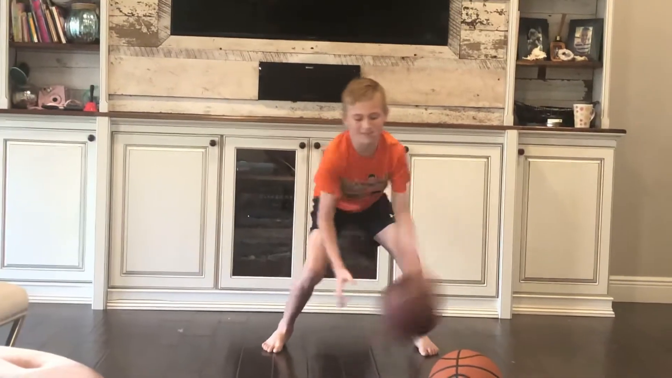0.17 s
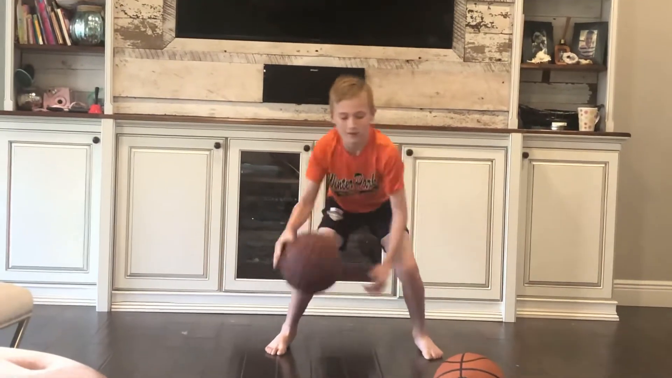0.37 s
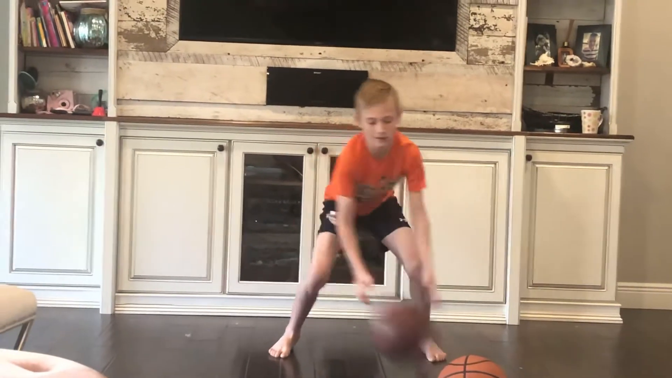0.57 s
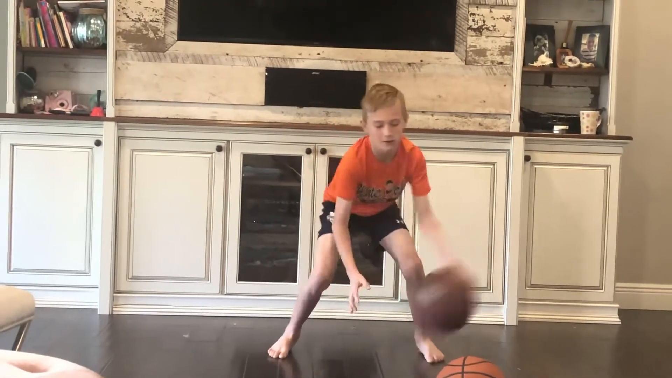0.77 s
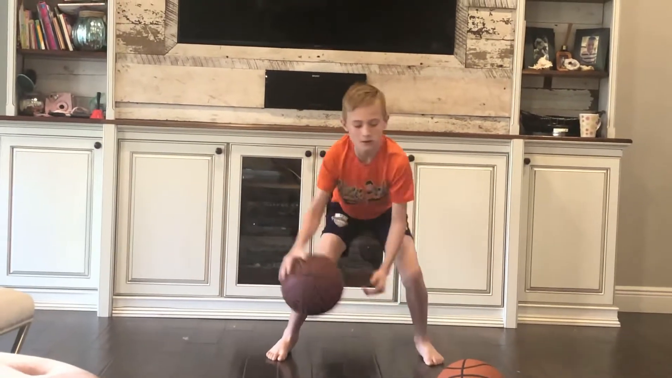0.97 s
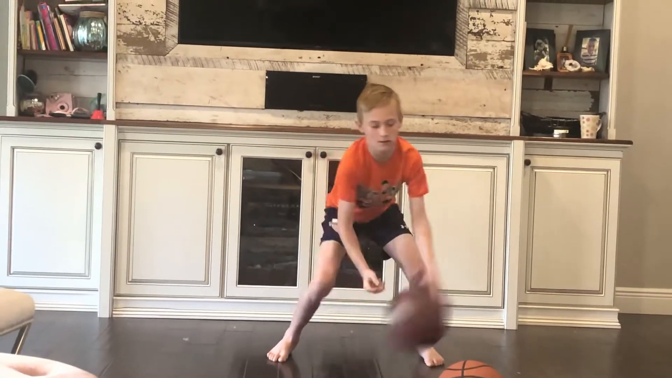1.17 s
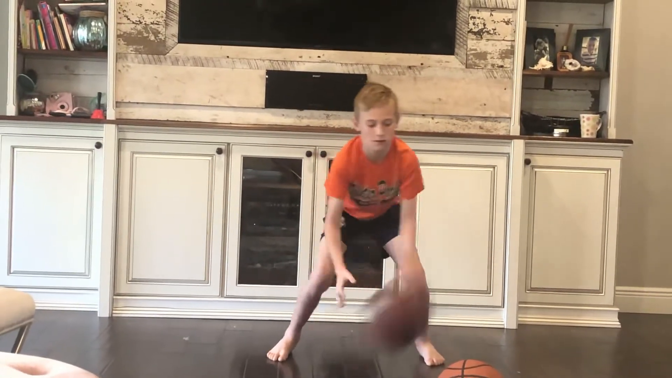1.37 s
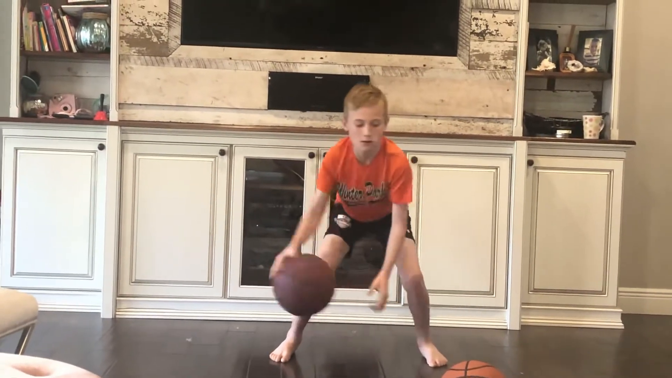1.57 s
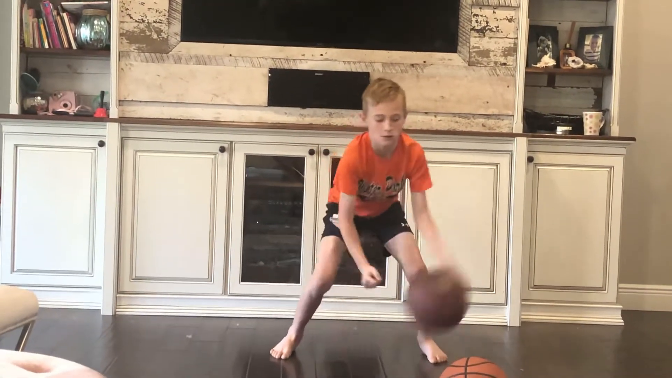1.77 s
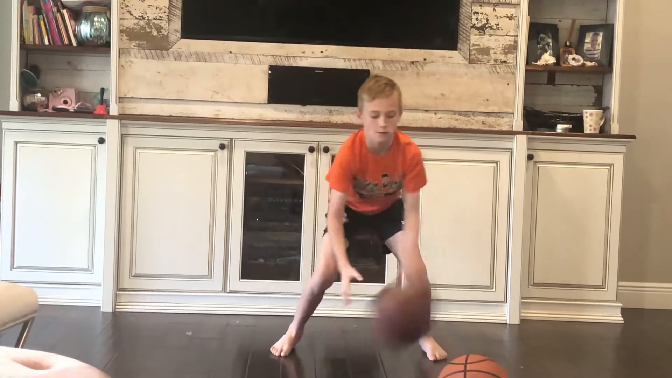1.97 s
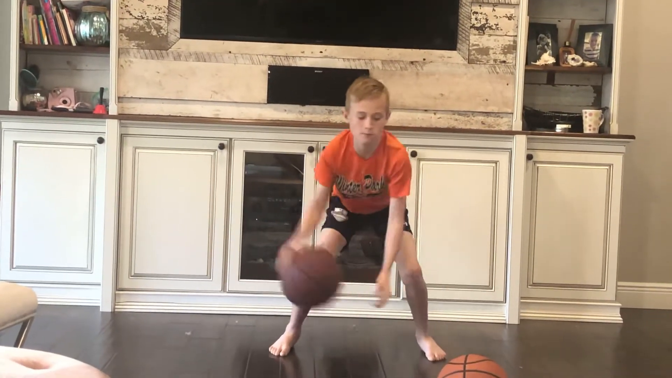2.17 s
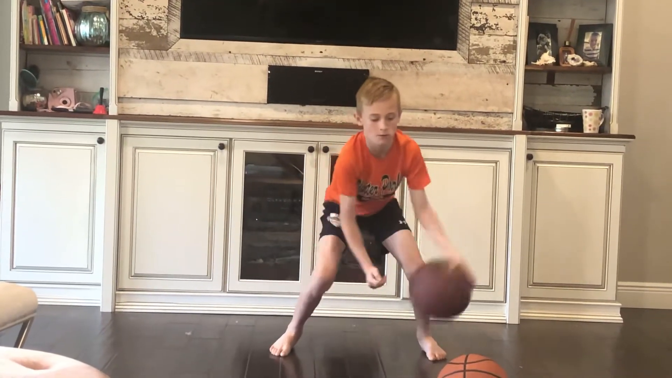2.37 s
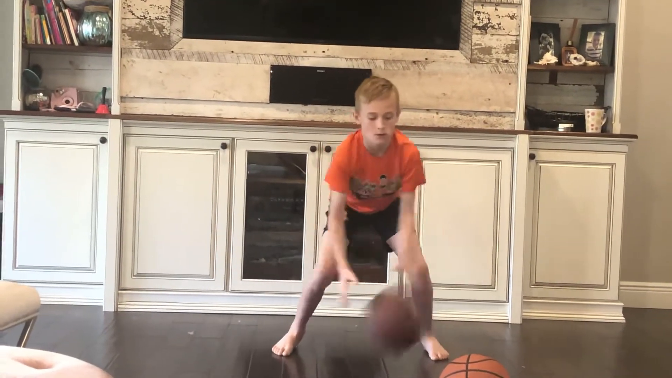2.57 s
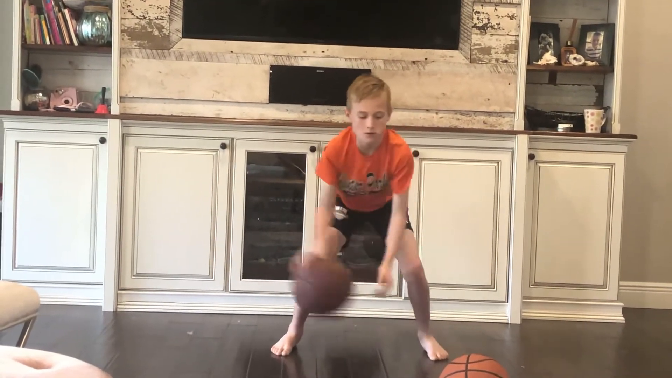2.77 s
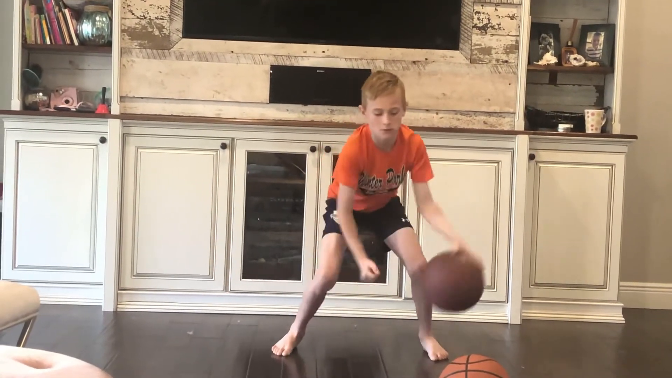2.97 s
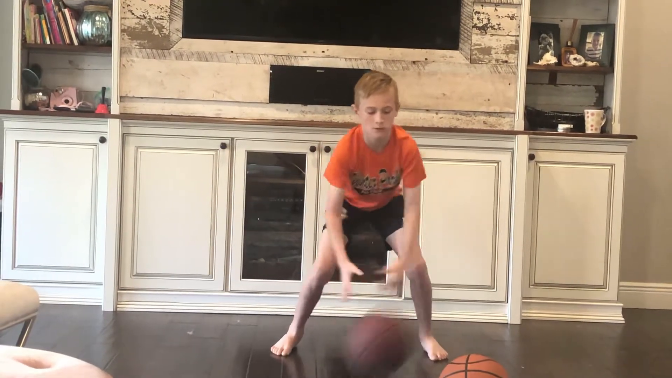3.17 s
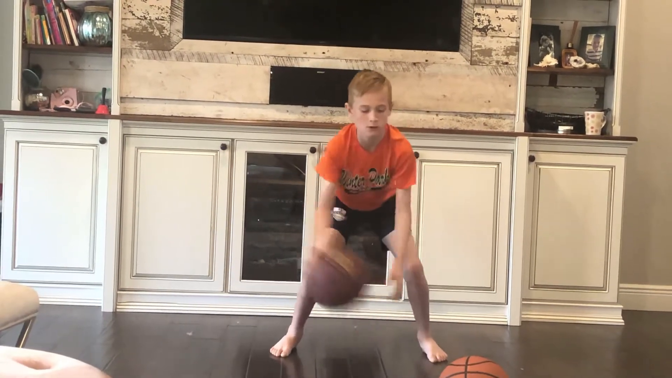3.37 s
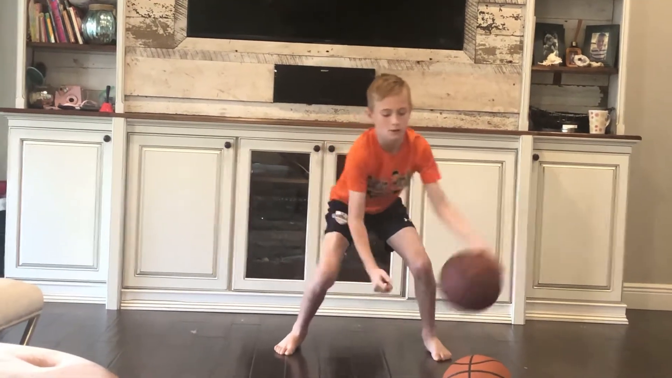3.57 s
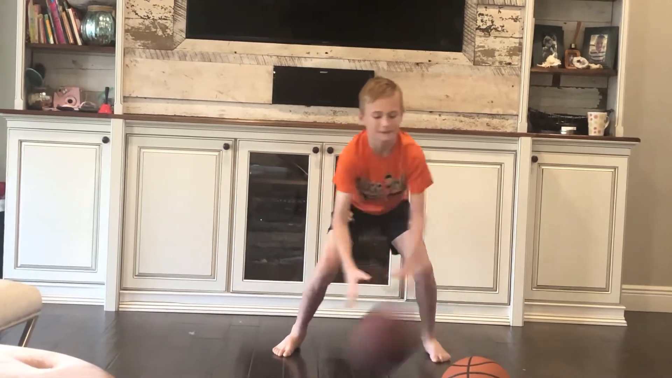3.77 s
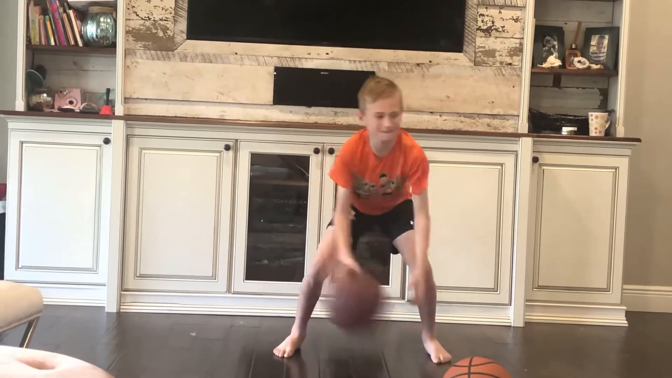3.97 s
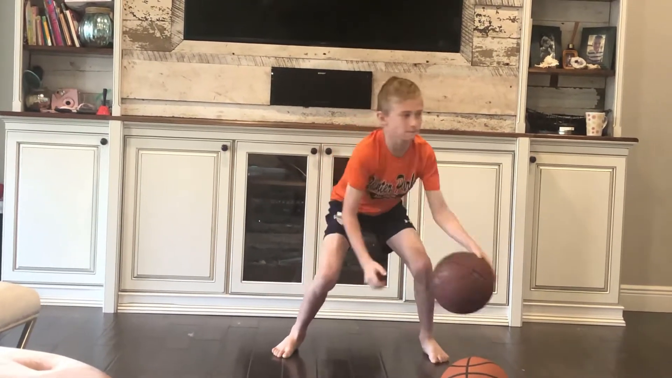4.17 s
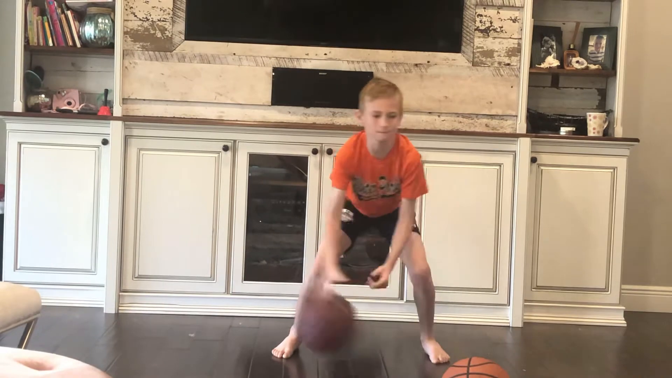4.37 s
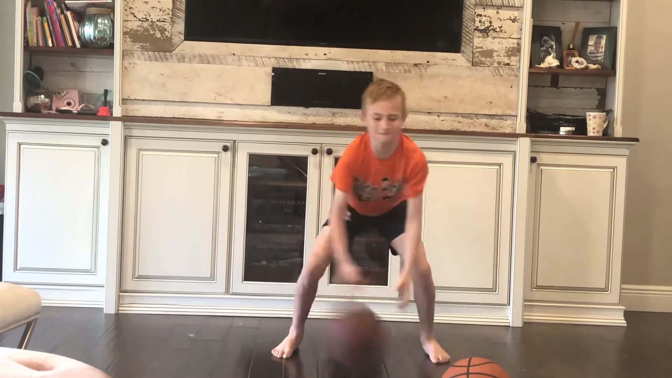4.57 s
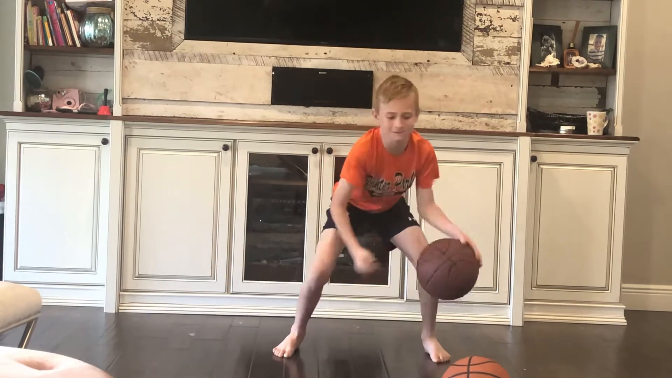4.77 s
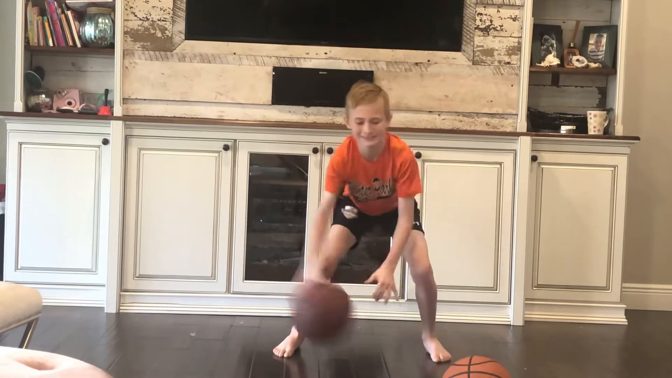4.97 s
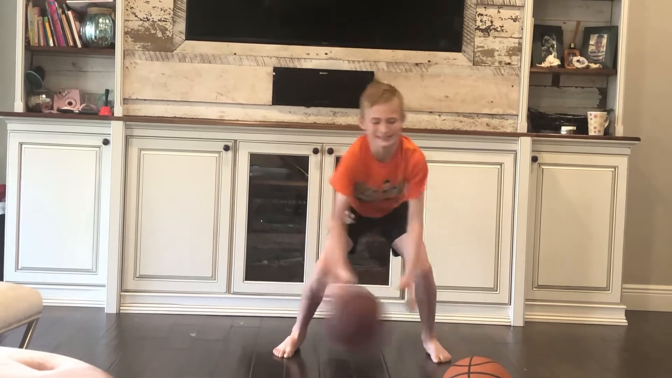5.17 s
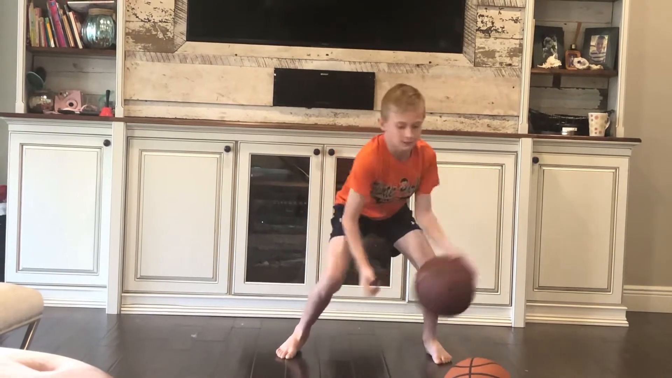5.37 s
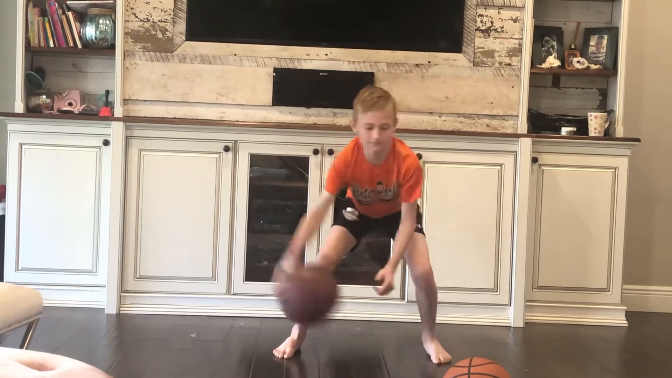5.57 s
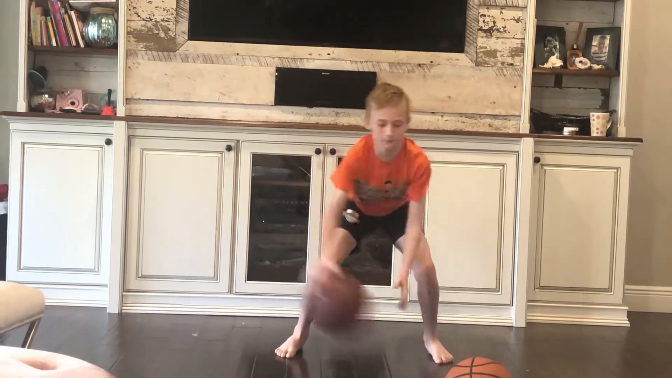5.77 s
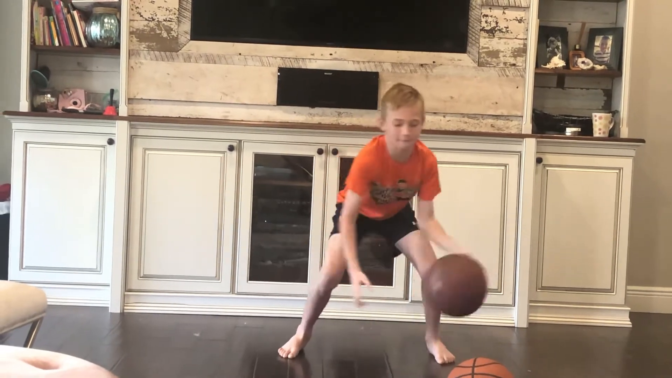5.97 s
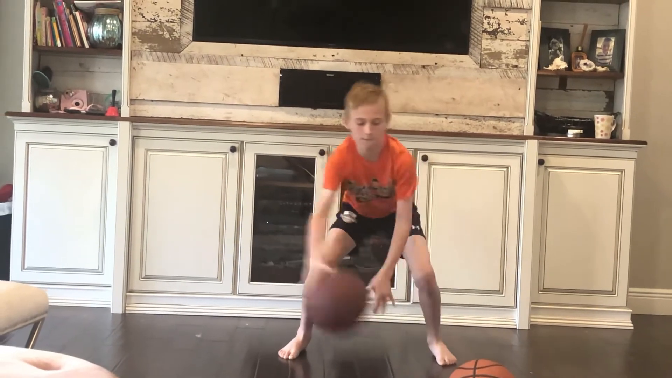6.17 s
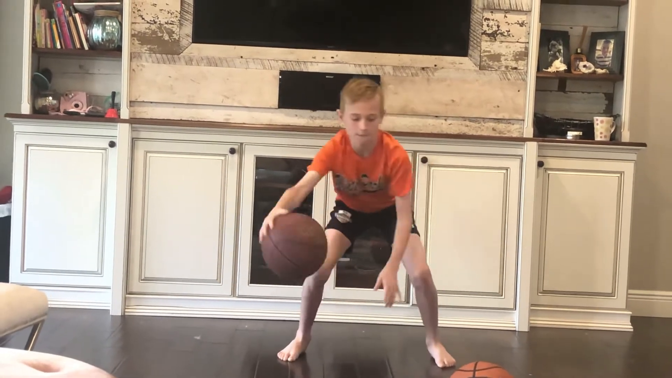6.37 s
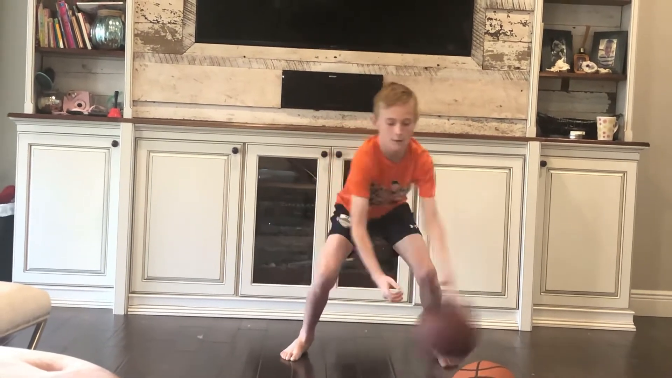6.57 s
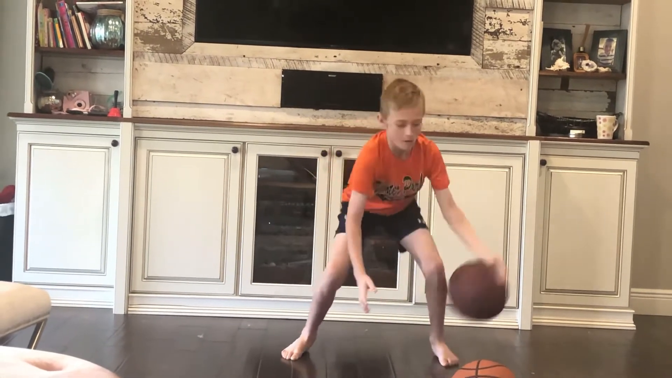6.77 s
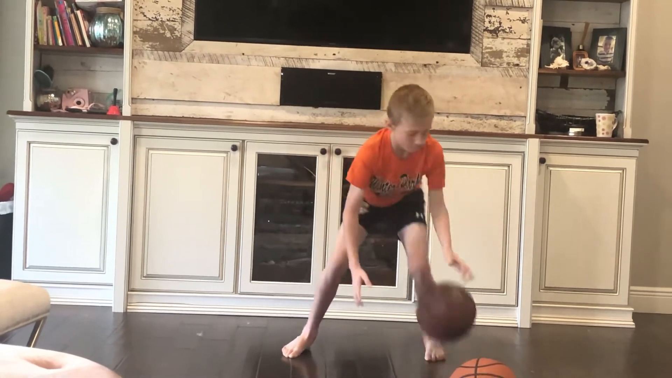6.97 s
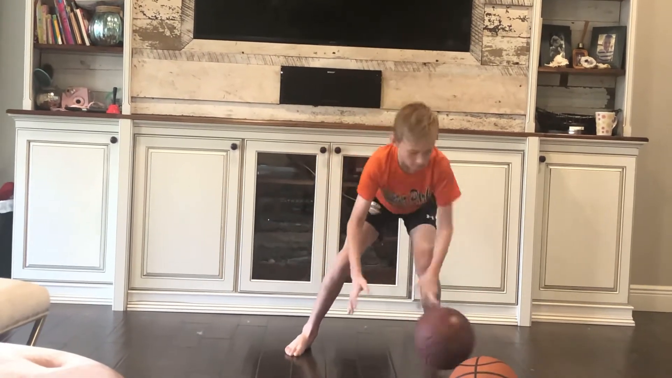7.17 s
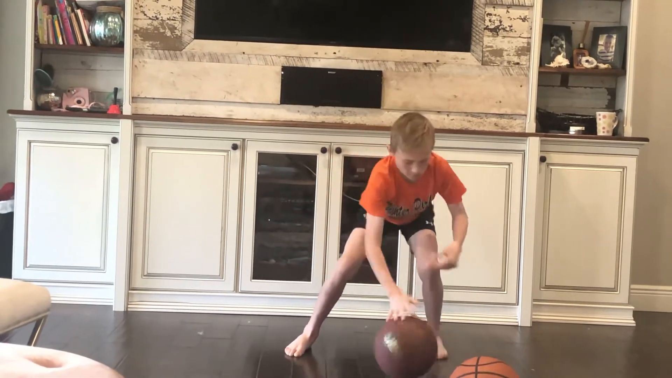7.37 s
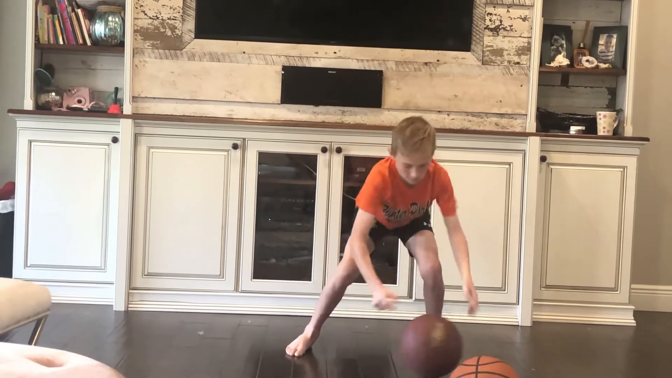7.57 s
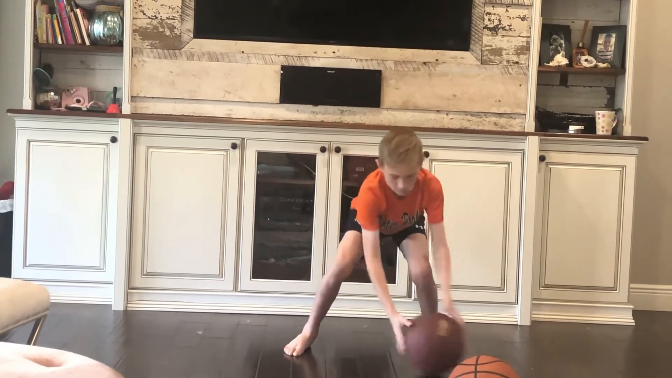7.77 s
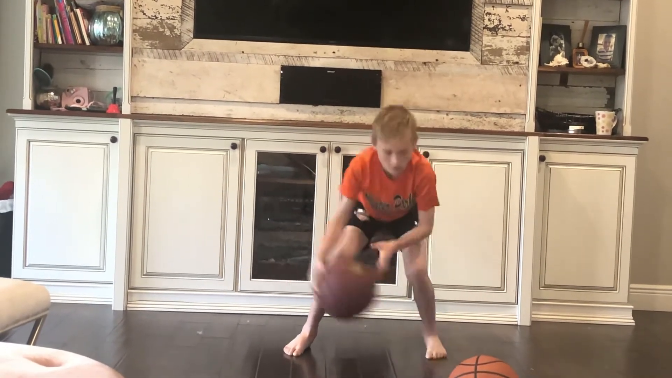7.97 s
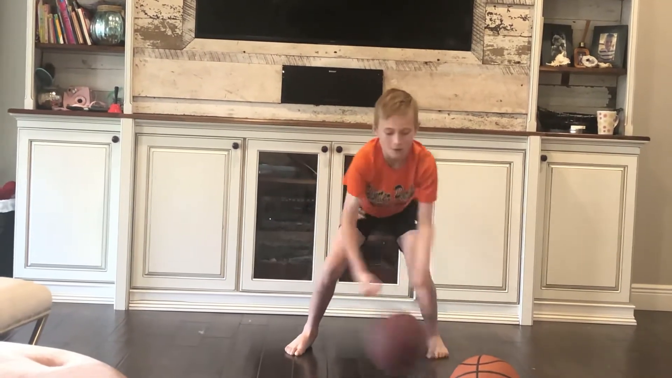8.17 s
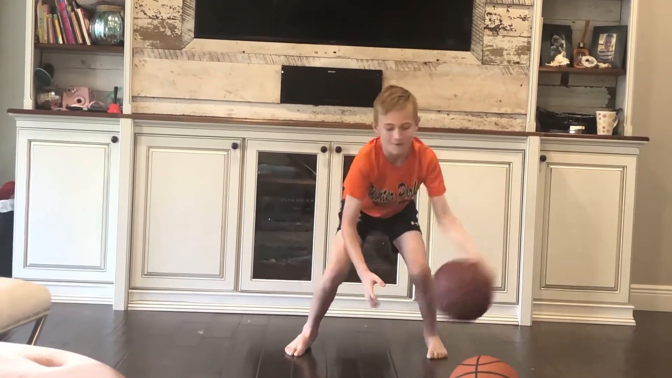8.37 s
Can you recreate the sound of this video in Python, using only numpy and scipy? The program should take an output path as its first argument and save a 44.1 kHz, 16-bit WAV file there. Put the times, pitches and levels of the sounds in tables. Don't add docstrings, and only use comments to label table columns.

```python
import sys
import numpy as np
from scipy import signal
from scipy.fft import irfft
from scipy.io import wavfile

SR = 44100
rng = np.random.default_rng(int(sys.argv[2]) if len(sys.argv) > 2 else 0)


def store_pcm(level_fs):
    pcm = np.round(np.clip(level_fs, -1, 1) * 32767).astype(np.int16)
    wavfile.write(sys.argv[1], SR, np.atleast_2d(pcm).T)


def volts_from_decibels(level):
    exponent = np.asarray(level, float) / 20
    return 10 ** exponent


N = 371763
LEAD = 4410
TAIL = 28000


def at_hz(points, hz):
    table_hz, value = np.array(points).T[:2]
    return np.interp(np.log(hz), np.log(table_hz), value)


def noise(size):
    return rng.standard_normal((2, size)) * np.sqrt(SR / 2)


def high_pass(x, order, hz):
    return signal.sosfilt(signal.butter(order, hz, "high", fs=SR, output="sos"), x)


def low_pass(x, order, hz):
    return signal.sosfilt(signal.butter(order, hz, fs=SR, output="sos"), x)


def band_pass(x, low_hz, high_hz):
    return signal.sosfilt(signal.butter(2, [low_hz, high_hz], "band", fs=SR, output="sos"), x)


def bands(white, shape):
    edges = 25 * 2 ** np.arange(0, 9.6, 0.5)
    total = 0
    for k, (low, high) in enumerate(zip(edges, edges[1:])):
        total = total + shape(np.sqrt(low * high)) * band_pass(white[k % len(white)], low, high)
    return total


# frequency in Hz, level in dB per Hz.
BACKGROUND = [(35, -88.5), (60, -83), (130, -73), (180, -89), (260, -93), (750, -92), (1500, -98.5),
              (2800, -107), (4500, -113), (8000, -117), (12000, -121), (16000, -123)]


def background():
    return bands(noise(N), lambda hz: volts_from_decibels(at_hz(BACKGROUND, hz)))


# frequency in Hz, decay by 60 dB in seconds.
ROOM_T60 = [(50, 0.12), (85, 0.69), (130, 0.49), (220, 0.63), (400, 0.51), (900, 0.85), (1700, 0.66),
            (3000, 0.53), (6400, 0.93), (12000, 0.2)]


def diffuse_tail(build_s, cycles, count):
    t = np.arange(TAIL) / SR

    def envelope(hz):
        clump_db = 2.0 * rng.standard_normal((count, TAIL // 400))
        clumps = np.array([np.interp(t, t[::400], volts_from_decibels(row)) for row in clump_db])
        swell = 1 - np.exp(-(t / (build_s + cycles / hz)) ** 2)
        return clumps * swell * volts_from_decibels(-60 * t / at_hz(ROOM_T60, hz))

    white = noise(count * TAIL).reshape(2, count, TAIL)
    return bands(white, envelope) / SR


def echoes(table, count):
    round_ms, round_loss_db = 9.4, 8.0
    out = np.zeros(SR // 5)
    rounds = np.arange(count + 1)
    for ms, db in table:
        at = np.round((ms + round_ms * rounds) * SR / 1000).astype(int)
        out[at] += volts_from_decibels(db - round_loss_db * rounds)
    return out


def standing_wave(level_db):
    hz, swell_s, t60_s = 121.86, 0.09, 0.45
    t = np.arange(TAIL) / SR
    swell = 1 - np.exp(-(t / swell_s) ** 4)
    return swell * volts_from_decibels(level_db - 60 * t / t60_s) * np.sin(2 * np.pi * hz * t)


# delay in ms, level in dB.
FAR_ECHOES = [(65.5, -5.0), (78.0, -4.0)]


def push(early, standing_db):
    deep = volts_from_decibels(17.0) * high_pass(diffuse_tail(build_s=0.053, cycles=0.42, count=1)[0], 2, 80)
    deep += standing_wave(standing_db)
    deep[:len(early)] += early + low_pass(echoes(FAR_ECHOES, count=0), 2, 100)
    return signal.fftconvolve(deep, np.hanning(176))


def modes(level_db, table, spread_db):
    t, out = np.arange(4000) / SR, np.zeros(4000)
    for hz, db, t60 in table:
        luck, side = rng.standard_normal(2)
        decay = volts_from_decibels(level_db + db + spread_db * luck - 60 * t / t60)
        out += np.sign(side) * decay * np.sin(2 * np.pi * hz * t)
    return low_pass(out, 3, 2200)


# frequency in Hz, level in dB, decay by 60 dB in seconds.
BOARDS = [(388.2, -4.5, 0.11), (415, 1.5, 0.044), (507, -3.5, 0.034)]
# frequency in Hz, level in dB, decay by 60 dB in seconds.
LOW_RING = [(606, -10, 0.0083), (684, -6, 0.029), (755, -4.5, 0.041), (838, -10, 0.047)]


def low_ring(push_db, low_db):
    boards = modes(0.64 * push_db + 0.24 * low_db - 18.0, BOARDS, spread_db=1.5)
    return boards + modes(low_db + 7.5, LOW_RING, spread_db=2.5)


# frequency in Hz, level in dB, decay by 60 dB in seconds.
UPPER_RING = [(908, -8, 0.013), (950, -12.5, 0.076), (1112, -1.5, 0.015), (1239, -2.5, 0.014),
              (1306, -4.5, 0.019), (1530, -10.5, 0.012), (1787, -10, 0.01), (1965, -15.5, 0.0056)]


def upper_ring(upper_db):
    return modes(upper_db + 7.0, UPPER_RING, spread_db=1.74)


# frequency in Hz, level in dB per Hz.
SLAP = [(500, -31), (1200, -14), (1900, 11), (2800, 5.5), (4400, -1), (6600, -8.5), (9800, -16.5),
        (14000, -29)]


def slap(slap_db):
    over_db = np.clip(slap_db + 56.5, -12.0, 12.0)
    tilt_db = -0.13 * over_db
    hz = np.maximum(np.arange(2001) * SR / 4000, 10)
    octaves = np.log2(np.clip(hz, 2100.0, 11500.0) / 3500)
    colour = volts_from_decibels(slap_db + at_hz(SLAP, hz) + tilt_db * octaves)
    delay = np.exp(-2j * np.pi * hz * 0.000789)
    return volts_from_decibels(29.0) * irfft(colour * delay)


def landings(hits, early_table, standing_db=-60.5):
    early, out = echoes(early_table, count=9), np.zeros(LEAD + N + SR)
    thump = push(early, standing_db)
    spaces = volts_from_decibels(27.5) * diffuse_tail(build_s=0.00035, cycles=3.4, count=len(hits))
    for (s, push_db, low_db, upper_db, slap_db), space in zip(hits, spaces):
        body, skin, tick = low_ring(push_db, low_db), upper_ring(upper_db), slap(slap_db)
        space[:len(early)] += volts_from_decibels(-13.5) * early
        space[round(0.008 * SR)] += volts_from_decibels(0.5)
        direct = volts_from_decibels(-6.5) * body + volts_from_decibels(4.5) * skin + volts_from_decibels(5.5) * tick
        reflected = signal.fftconvolve(body + skin + tick, space)
        at = round(s * SR) + LEAD
        for part in (volts_from_decibels(push_db) * thump, direct, reflected):
            out[at:at + len(part)] += part
    return out[LEAD:LEAD + N]


# start in seconds, then push, low ring, upper ring and slap in dB.
RIGHT_HITS = [(-.0388, -15, -36, -45.5, -70), (0.5515, -11.5, -51, -42, -68.5),
              (1.1117, -13.5, -42, -44, -60.5), (1.679, -12.5, -40.5, -46.5, -63),
              (2.2634, -13, -44.5, -38.5, -64), (2.844, -12.5, -41, -39.5, -66),
              (3.4577, -11, -41, -41, -78), (4.0196, -10.5, -41, -42, -62),
              (4.5775, -14.5, -44, -43.5, -65.5), (5.201, -12, -42, -45.5, -65),
              (5.7871, -11.5, -41.5, -39, -65), (6.5314, -10.5, -37, -46, -62.5),
              (8.1646, -14.5, -42.5, -47.5, -71.5)]
LEFT_HITS = [(0.2098, -14, -42, -45, -61), (0.8383, -14, -34, -43.5, -68.5),
             (1.4086, -13.5, -42.5, -42.5, -61), (1.9728, -14, -42.5, -43.5, -61.5),
             (2.5627, -15.1, -44, -44, -59.5), (3.1375, -13.4, -41.5, -47, -65.5),
             (3.7426, -12.5, -43, -41, -65.5), (4.3259, -15.5, -45, -48.5, -64.5),
             (4.9108, -13.5, -40.5, -42, -71), (5.4673, -14, -38, -43, -69.5)]
WIDE_HIT = [
    (6.0787, -12.5, -39, -45.5, -61),
]
STRAY_HIT = [
    (6.87, -20.5, -48.5, -45.5, -76),
]
LOOSE_HIT = [
    (7.1313, -17.5, -43.5, -47.5, -72),
    (7.897, -63, -84, -77, -79.5),
]
# start in seconds, push in dB.
PATTER = [
    (7.282, -35),
    (7.336, -32),
    (7.375, -34),
    (7.41, -38),
    (7.645, -38.5),
    (7.765, -43.5),
]
# delay in ms, level in dB.
RIGHT_ECHOES = [(4.0, -11.6), (10.4, -10), (12.8, -3.7), (30.8, -12.4), (35.2, -6.2), (36.8, -3.5),
                (38.8, -5.4), (41.2, -11)]
LEFT_ECHOES = [(4.4, -4.4), (10.4, -2), (14.8, -13), (24.8, -9.2), (27.2, -3.1), (29.2, -6.7), (38.0, -5.5),
               (62.4, -15)]
WIDE_ECHOES = [(4.4, -1), (10.0, -2.2), (20.4, -10), (26.8, -13.5), (36.4, -9), (38.4, -5), (44.0, -12)]
STRAY_ECHOES = [(13.2, -12), (19.2, -8.5), (27.2, -5.8), (33.2, -6.8), (34.8, -3.7), (36.8, -5.4),
                (78.0, -11), (85.6, -11)]
LOOSE_ECHOES = [(4.0, -8.2), (5.6, -5.3), (10.0, 0.0), (12.4, -0.2), (14.0, -6.6), (17.6, -3.4),
                (31.2, -9.1), (36.4, -10)]


def ball():
    patter = [(s, db, db - 22, db - 23.5, db - 53) for s, db in PATTER]
    out = landings(RIGHT_HITS, RIGHT_ECHOES, standing_db=-51.5)
    out += landings(LEFT_HITS, LEFT_ECHOES)
    out += landings(WIDE_HIT, WIDE_ECHOES)
    out += landings(STRAY_HIT, STRAY_ECHOES)
    out += landings(LOOSE_HIT + patter, LOOSE_ECHOES)
    return high_pass(high_pass(out, 4, 90), 2, 42)


# start in seconds, level in dB, pitch in Hz,
# decay by 60 dB in seconds.
RATTLES = [(0.211, -69, 4210, 0.45), (3.468, -65.5, 4630, 0.23), (3.746, -62, 3950, 0.49),
           (4.58, -76, 4860, 0.95), (4.915, -67, 4660, 0.62), (5.471, -67, 4600, 0.55)]


def rattles():
    out, t = np.zeros(N), np.arange(TAIL) / SR
    for s, db, hz, t60 in RATTLES:
        buzz = band_pass(rng.standard_normal(TAIL), hz * 0.9, hz * 1.1)
        buzz *= volts_from_decibels(14.0 + db - 60 * t / t60) * np.minimum(t / 0.004, 1)
        out[round(s * SR):][:TAIL] += buzz
    return out


# start in seconds, peak in dB, start and end pitch in Hz,
# length in seconds.
THUDS = [
    (0.766, -28, 305, 72.4, 0.05),
    (6.481, -36, 323, 68.5, .04),
]


def thuds():
    out = np.zeros(N)
    for s, db, start_hz, end_hz, length in THUDS:
        u = np.arange(round(length * SR)) / (length * SR)
        hz = end_hz + (start_hz - end_hz) * np.exp(-u / 0.15)
        shape = np.sin(np.pi * u ** 0.48) ** 2.2
        out[round(s * SR):][:len(u)] -= volts_from_decibels(db) * shape * np.sin(2 * np.pi * np.cumsum(hz) / SR)
    return out


def scene():
    return (background() + ball() + rattles() + thuds())[None]


def top_cut(x):
    return signal.sosfilt(signal.butter(12, 15150, fs=SR, output="sos"), x)


def record(dry):
    return top_cut(dry)


dry = scene()
out = record(dry)
store_pcm(out)
```